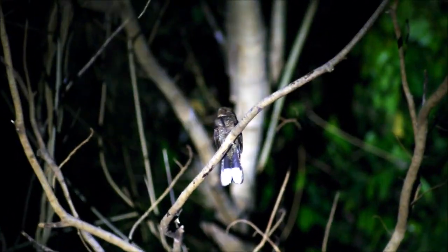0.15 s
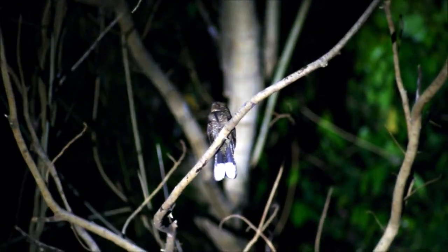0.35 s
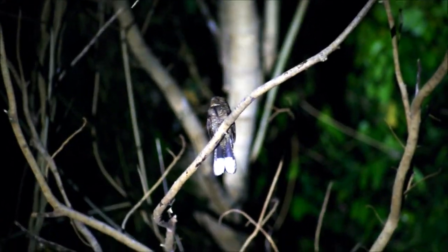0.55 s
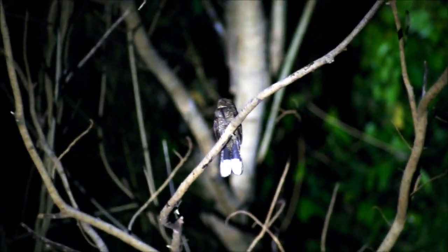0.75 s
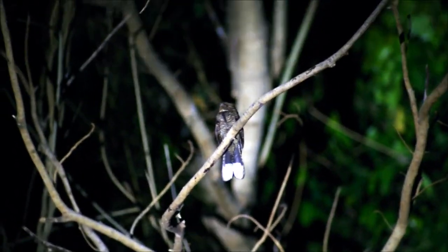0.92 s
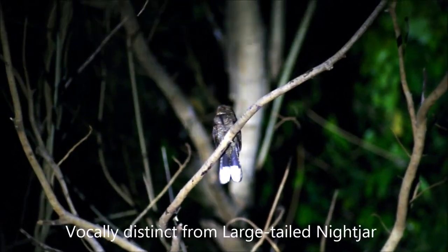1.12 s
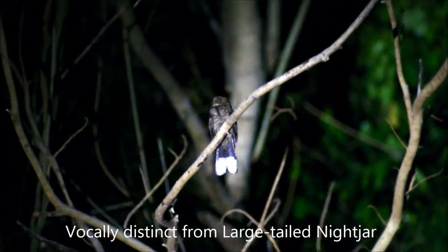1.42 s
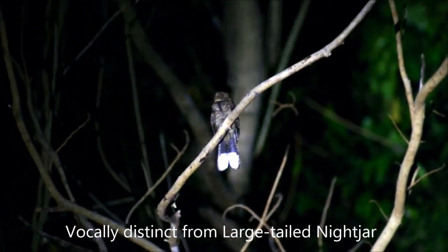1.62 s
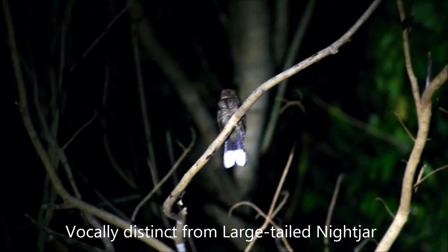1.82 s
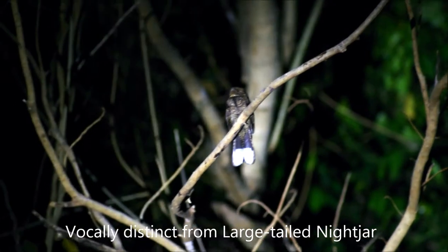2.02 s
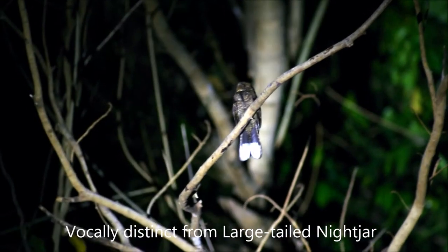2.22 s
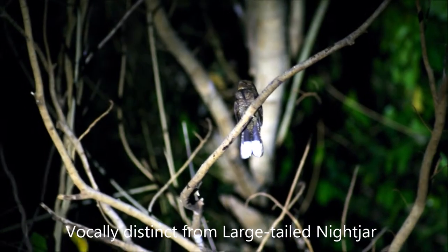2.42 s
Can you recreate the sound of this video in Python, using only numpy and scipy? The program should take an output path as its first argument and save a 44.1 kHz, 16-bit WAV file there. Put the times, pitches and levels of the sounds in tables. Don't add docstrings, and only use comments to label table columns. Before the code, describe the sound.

A nightjar gives short, hollow, dropping 'chonk' notes, about seven every two seconds, with a brief woodland echo. Steady night hiss and faint crickets lie underneath, with small twig ticks; the bird stops just before the end.

```python
import sys
import numpy as np
from scipy import signal
from scipy.fft import rfft, irfft, next_fast_len
from scipy.io import wavfile
from scipy.ndimage import uniform_filter1d

SR = 44100
rng = np.random.default_rng(int(sys.argv[2]) if len(sys.argv) > 2 else 0)


def ratio_of_db(decibels):
    return 10 ** (np.asarray(decibels, float) / 20)


def transcribe(u):
    v = np.clip(np.atleast_2d(u).T, -1, 1)
    q = np.round(v * 32767).astype(np.int16)
    wavfile.write(sys.argv[1], SR, q)


N = 112454


def band(x, hz, width):
    quality = max(hz / width, .3)
    y = signal.lfilter(*signal.iirpeak(min(hz, .45 * SR), quality, fs=SR), x)
    return y / np.std(y)


def walk(rate):
    hold = int(SR / rate)
    steps = np.repeat(rng.standard_normal(N // hold + 1), hold)
    level = uniform_filter1d(steps, hold)[:N]
    return level / np.std(level)


def swell(t, peak, rise, fall):
    return np.exp(-((t - peak) / np.where(t < peak, rise, fall)) ** 2 / 2 * 1.84)


# peak_s, rise_s, fall_s, pitch_hz, level_db
FLUTTER = [(.003, .003, .005, 1960, -28.5), (.009, .0065, .0035, 1742, -20.5),
           (.0142, .004, .004, 1495, -16.7), (.001, .0015, .003, 1495, -28)]
# peak_s, rise_s, fall_s, pitch_hz, level_db
FALL = [(.017, .003, .0045, 1190, -27), (.0165, .0025, .0055, 855, -26.5)]
# peak_s, rise_s, fall_s, pitch_hz, level_db
LOW_TONES = [
    (.0281, .0048, .005, 942, -17.7),
    (.0355, .0025, .0045, 1090, -28.5),
    (.040, .004, .004, 905, -30),
    (.047, .007, .008, 640, -34),
    (.063, .003, .007, 815, -32.5),
]
FLUTTER_S, DROP_BEAT_S = .0095, .0186
LOW_GLIDE_HZ_PER_S, DROP_GLIDE_HZ_PER_S = 12000, -14000
RASP_HZ, RASP_DB = 4400, -55
ONSET_S = .0007


def note(pitch, beat_db, scatter):
    t = np.arange(int(.09 * SR)) / SR - .002
    turn = 2 * np.pi
    out = np.zeros(len(t))
    for peak, rise, fall, hz, db in FLUTTER:
        out += ratio_of_db(db) * swell(t, peak, rise, fall) * np.cos(turn * hz * scatter * (t - FLUTTER_S))

    lead_cycles = FLUTTER[2][3] * (DROP_BEAT_S - FLUTTER_S)
    since = t - DROP_BEAT_S
    for peak, rise, fall, hz, db in FALL:
        glide = (hz < 1000) * DROP_GLIDE_HZ_PER_S * since ** 2 / 2
        cycles = hz * pitch * since + glide + lead_cycles
        out += ratio_of_db(db) * swell(t, peak, rise, fall) * np.cos(turn * cycles)

    breath = band(rng.standard_normal(len(t)), RASP_HZ, 800)
    out += ratio_of_db(RASP_DB) * swell(t, 0.018, 0.013, 0.0054) * breath

    for k, (peak, rise, fall, hz, db) in enumerate(LOW_TONES):
        since = t - peak
        cycles = hz * pitch * since + (k == 0) * LOW_GLIDE_HZ_PER_S * since ** 2 / 2
        level = ratio_of_db(db + (k in (1, 2)) * beat_db)
        out += level * swell(t, peak, rise, fall) * np.cos(turn * cycles)
    return out * np.clip(1 + t / ONSET_S / 2, 0, 1) ** 2


# start_s, level_db, low_pitch_shift_percent, after_beat_db
CHONKS = [
    (-.068, -1, 0, 0),
    (.2151, -.3, -2, 0),
    (.4945, .3, 1, 3.5),
    (.7807, .3, -1, 7),
    (1.0591, .3, -1, 0),
    (1.3384, .3, 0, 0),
    (1.6229, .3, 1, -1),
    (1.9137, .3, 0, 0),
    (2.2066, -.3, -1, 0),
]
# delay_s, level_db
TRUNKS = [(.018, -18), (.032, -25), (.043, -26), (.052, -28)]
WOBBLE = 0.0013
TAIL_DB, TAIL_T60_S, TAIL_RISE_S, TAIL_BRIGHT = -17, 0.44, 0.017, 0.87
LEAVES_DB = -15.5


def nightjar():
    lead = int(.1 * SR)
    t = np.arange(int(.45 * SR)) / SR
    fade = ratio_of_db(-60 * t / TAIL_T60_S) * np.clip(t / TAIL_RISE_S - 1, 0, 1)
    fade = fade / np.sqrt(np.sum(fade ** 2))

    diffuse = 5 * signal.lfilter([1, -TAIL_BRIGHT], 1, rng.standard_normal(len(t)))
    wood = ratio_of_db(TAIL_DB) * fade * diffuse
    wood[0] = 1
    for delay, db in TRUNKS:
        wood[int(delay * SR)] += ratio_of_db(db)

    out = np.zeros(N + 7 * lead)
    for start, db, shift, beat_db in CHONKS:
        call = note(1 + shift / 100, beat_db, 1 + WOBBLE * rng.standard_normal())
        leaves = ratio_of_db(LEAVES_DB) * fade * rng.standard_normal(len(t))
        call = signal.fftconvolve(call, wood + leaves)
        i = int((start - .002) * SR) + lead
        out[i:i + len(call)] += ratio_of_db(db) * call
    return out[lead:lead + N]


# pitch_hz, width_hz, level_db, throb_per_s, throb_db
CRICKETS = [
    (2684, 206, -56.5, 60, 0),
    (2474, 120, -65, 40, 4),
    (3480, 280, -69, 64, 5),
    (6186, 630, -61, 140, 1.5),
    (7460, 710, -62.5, 100, -2),
]


def crickets():
    out = np.zeros(N)
    for hz, width, db, rate, throb_db in CRICKETS:
        chorus = rng.standard_normal(N)
        for _ in range(3):
            chorus = band(chorus, hz, 1.5 * width)
        out += ratio_of_db(db + throb_db * walk(rate) + 1.0 * walk(8.01)) * chorus
    return out


# pitch_hz, level_db (per Hz)
NIGHT = [(30, -43), (110, -15), (200, -5.5), (380, -0.5), (1400, -2), (2200, -8), (5400, -17.5),
         (9000, -24)]
NIGHT_DB, FLICKER_DB = -47, 1.1
TOP_HZ, TOP_FALL_DB = 15050, -13


def night():
    size = next_fast_len(N, True)
    hz = np.fft.rfftfreq(size, 1 / SR) + 1
    table = np.array(NIGHT)
    db = np.interp(np.log(hz), np.log(table[:, 0]), table[:, 1])
    db += TOP_FALL_DB * np.clip((hz - TOP_HZ) / 700, 0, 4)
    noise = rfft(rng.standard_normal(size)) * ratio_of_db(db)
    shared = walk(11.9)
    out = np.zeros(N)
    for step in range(20):
        part = np.cos(np.clip(2 * np.log2(hz / 22) - step, -1, 1) * np.pi / 2) ** 2
        flicker_db = FLICKER_DB * walk(15) + 0.57 * shared * (step > 13)
        out += irfft(noise * part, size)[:N] * ratio_of_db(flicker_db)
    return ratio_of_db(NIGHT_DB) * out / np.std(out)


# pitch_hz, level_db
WHINE = [(14912, -89), (14971, -81), (15030, -81), (15089, -89)]


def whine():
    t = np.arange(N) / SR
    return sum(ratio_of_db(db) * np.sqrt(2) * np.sin(2 * np.pi * hz * t) for hz, db in WHINE)


# centre_s, above_hz, depth_db
GAPS = [(.663, 4000, -22), (1.132, 3000, -22), (1.517, 3500, -22), (1.727, 3800, -22), (2.285, 2800, -22)]
GAP_S = .008


def gaps(x):
    t = np.arange(N) / SR
    for centre, hz, db in GAPS:
        highpass = signal.butter(4, hz, "high", fs=SR, output="sos")
        high = signal.sosfiltfilt(highpass, x)
        x = x - high * (1 - ratio_of_db(db)) * np.exp(-((t - centre) / GAP_S) ** 4)
    return x


# start_s, peak_db, centre_hz, width_hz, sparkle_db
TICKS = [
    (.8375, -30, 3400, 2500, -58),
    (1.0311, -37, 3500, 3000, -46),
    (1.2007, -26.5, 3300, 3000, -45),
    (1.385, -44, 5000, 5000, -52),
    (1.468, -41, 2500, 2500, -60),
    (1.583, -44, 5000, 3000, -50),
    (1.6916, -38, 3800, 3000, -49),
    (1.755, -38, 4000, 2000, -60),
    (1.7948, -35, 4000, 1500, -56),
]
TICK_S, SPARKLE_HZ = .0012, 13500


def twigs():
    t = np.arange(600) / SR
    out = np.zeros(N)
    for start, db, hz, width, sparkle_db in TICKS:
        i = int(start * SR)
        snap = rng.standard_normal(600) * np.exp(-t / TICK_S)
        snap[0] = 6
        for level_db, centre, spread in (db, hz, width), (sparkle_db, SPARKLE_HZ, 4000):
            ring = band(band(snap, centre, spread), centre, spread)
            out[i:i + 600] += ratio_of_db(level_db) * ring / np.abs(ring).max()
    return out


# peak_s, rise_s, fall_s, centre_hz, level_db
RUSTLE = [
    (2.01, .004, .06, 3900, -50),
    (2.04, .015, .015, 14000, -62),
    (2.04, .02, .05, 6000, -63),
]


def leaf_rustle():
    t, out = np.arange(N) / SR, np.zeros(N)
    for peak, rise, fall, hz, db in RUSTLE:
        brush = band(rng.standard_normal(N), hz, 1700)
        out += ratio_of_db(db + 1.7 * walk(200)) * swell(t, peak, rise, fall) * brush
    return out


def scene():
    return (nightjar() + crickets() + gaps(night()) + twigs() + leaf_rustle())[None]


def band_limit(x):
    return signal.sosfilt(signal.butter(12, 15930, fs=SR, output="sos"), x)


def record(dry):
    top_cut = signal.ellip(8, .5, 60, 15750, fs=SR, output="sos")
    mix = signal.sosfilt(top_cut, dry + whine())
    return band_limit(mix)


dry = scene()
out = record(dry)
transcribe(out)
```